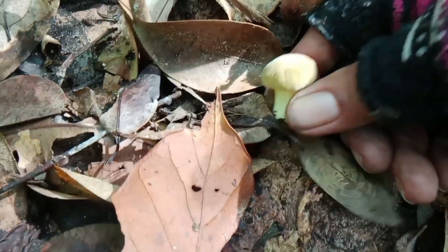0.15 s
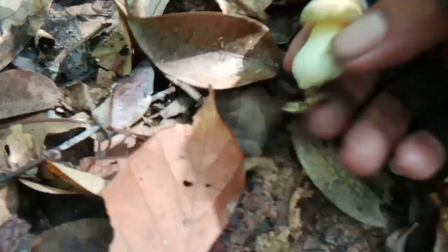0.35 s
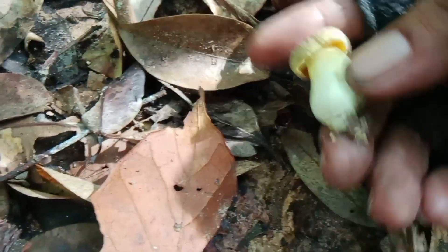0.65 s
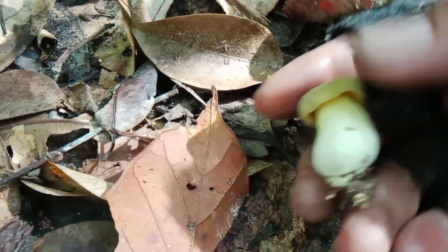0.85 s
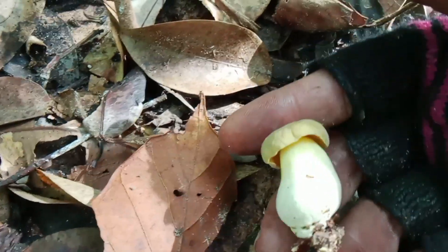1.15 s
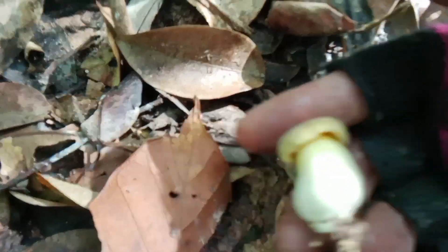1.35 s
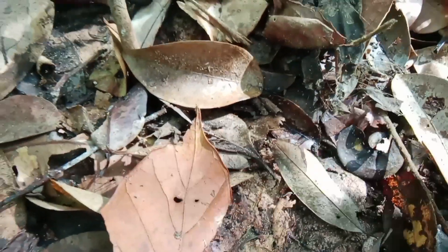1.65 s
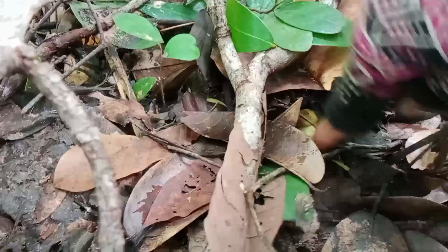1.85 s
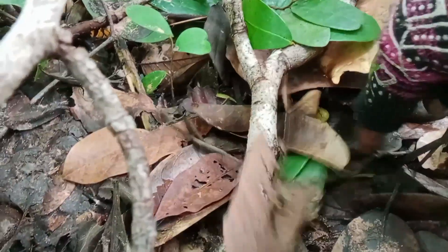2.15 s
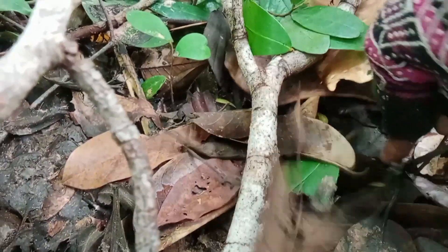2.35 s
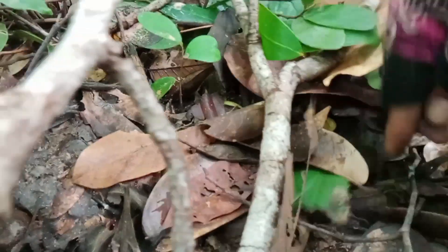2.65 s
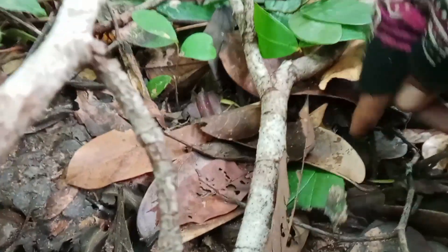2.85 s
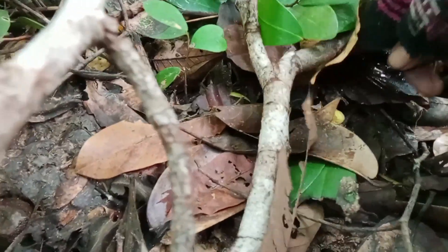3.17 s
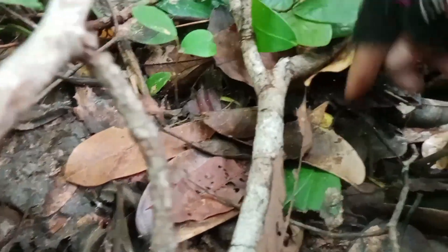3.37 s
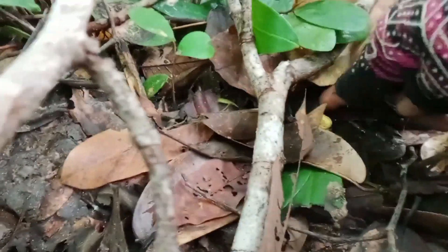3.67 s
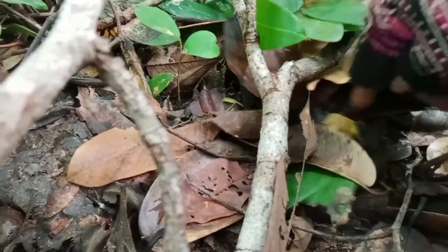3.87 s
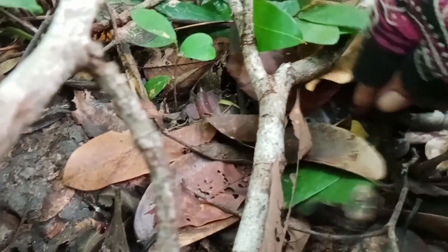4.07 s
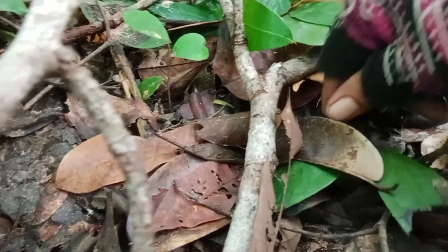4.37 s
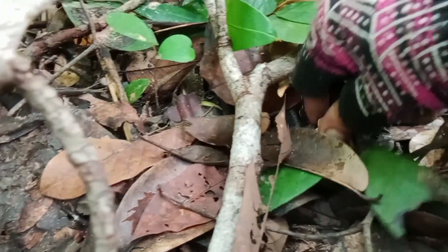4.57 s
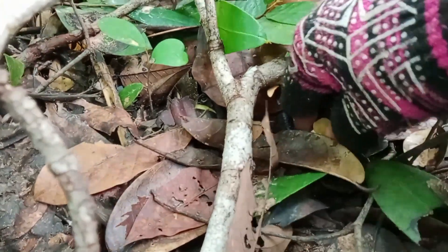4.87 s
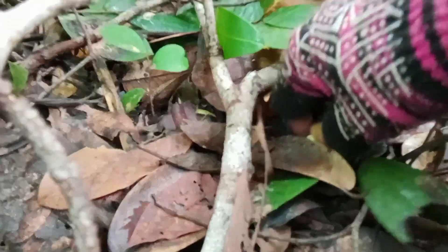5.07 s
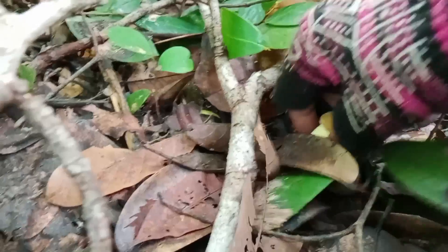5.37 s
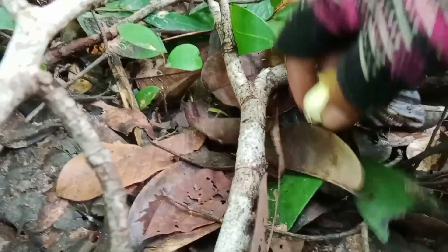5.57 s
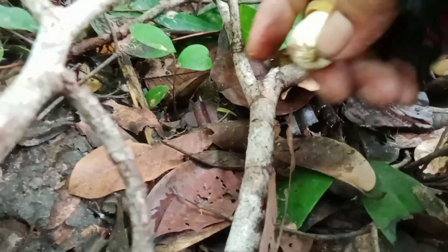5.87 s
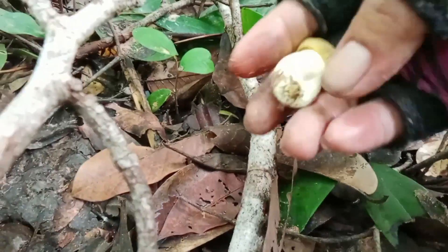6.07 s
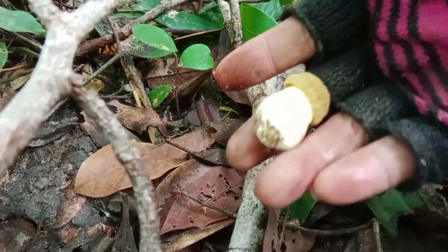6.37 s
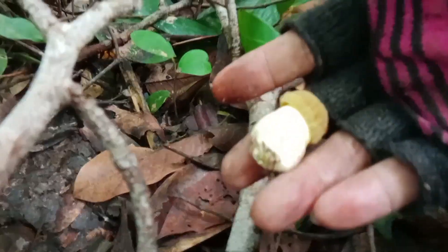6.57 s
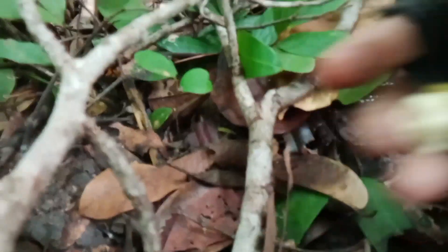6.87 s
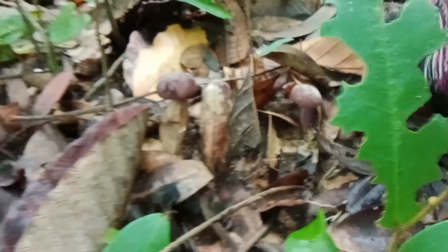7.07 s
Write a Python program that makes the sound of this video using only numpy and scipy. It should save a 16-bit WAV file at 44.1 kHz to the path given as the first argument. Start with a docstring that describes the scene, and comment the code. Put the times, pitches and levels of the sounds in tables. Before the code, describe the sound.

Close outdoor sound on a forest floor: faint leaf touches under steady, wavering insect trills, then sound cuts out briefly. It returns with louder crunching and crisp snapping of dry leaves and twigs, with dull soil rubbing, strongest mid-way. Handling thins to separate clicks while the cicadas swell and dip; a far bird glides downward, and silence blinks once more near the end.

```python
"""Mushroom picking in dry leaves

Forest floor, microphone close: a hand rustles, rubs and snaps leaf litter, made of tiny random fractures
ringing in resonances, single splinter bursts and a low noise rub of the soil. Among the trees two kinds of
cicada drone as pulsing, swinging tones; far off a bird calls in gliding whistles. Coloured noise makes the
distant air, and the handled microphone adds a low rumble. Twice the sound drops out for a moment."""
import sys
import numpy as np
from scipy import signal
from scipy.fft import rfft, irfft
from scipy.io import wavfile
from scipy.ndimage import uniform_filter1d

SR = 44100
rng = np.random.default_rng(int(sys.argv[2]) if len(sys.argv) > 2 else 0)


def persist_wave(psi):
    """Save psi, clipped to +-1, as 16-bit WAV."""
    counts = np.round(np.clip(psi, -1, 1) * 32767).astype(np.int16)
    wavfile.write(sys.argv[1], SR, np.atleast_2d(counts).T)


N = 318827

# Far air and insects, colour: (frequency [Hz], relative level per Hz [dB])
AIR_COLOUR = [(30, -16), (100, -10), (200, -1), (300, -2.5), (500, -5.5), (1200, -9.5), (3000, -14),
              (4200, -11.5), (6000, -12.5), (7700, -18.5), (8200, -17), (9500, -25.5), (10700, -36.5),
              (11400, -32), (12500, -41.5), (15000, -40)]
# Low rumble of the handled microphone: (time [s], level [dB])
RUMBLE_LEVEL = [(0, -69), (1.8, -71), (2.1, -60.5), (3.2, -62), (3.8, -67), (5.5, -65.5), (6.5, -66),
                (6.8, -61), (7.2, -70)]
# Colour of that rumble: (frequency [Hz], relative level per Hz [dB])
RUMBLE_COLOUR = [(25, -34.5), (55, -18.5), (77, 1.5), (100, -6.5), (150, 1), (200, -9.5), (300, -23.5),
                 (1000, -60)]
# Far bird: (start [s], length [s], start pitch [Hz], end pitch [Hz], level before mixing with its echoes [dB])
BIRD_WHISTLES = [(.03, 0.17, 2750, 2635, -67.5), (0.197, 0.22, 2450, 2350, -68),
                 (0.81, 0.053, 2274, 2320, -57.5), (0.833, 0.031, 3150, 3190, -61.5),
                 (5.71, 0.22, 3630, 3580, -74), (5.88, 0.16, 3430, 2920, -66),
                 (6.868, .12, 3400, 2870, -58)]

# Low cicadas among the trees, pitches before the stretch of the spot:
# (offset from the centre [Hz], pitch swing [Hz], mean pulse rate [1/s], relative level [dB])
LOW_CICADAS = [(-85.5, 29, 48, -1.5), (-9.5, 60, 29, 0.5), (26.5, 146, 34, -2.5), (81, 4.4, 58, -2.5)]
# High cicadas among the trees, pitches before the chorus stretch:
# (pitch [Hz], pitch swing [Hz], mean pulse rate [1/s], relative level [dB])
HIGH_CICADAS = [(6737, 48, 27, -7.5), (6910, 140, 81, -0.5), (7105, 67, 14, -2), (7123, 111, 39, 2),
                (7390, 54, 22, -10), (8362, 157, 61, -14), (4000, 32, 38, -26.5), (9920, 220, 64, -39.5)]
# Slow swell of the low chorus: (time [s], level [dB])
LOW_SWELL = [(0.0, -47.5), (2.0, -50.5), (2.1, -47), (2.7, -45), (3.2, -47.5), (3.8, -46.5), (4.1, -52),
             (4.2, -47.5), (5.0, -56.5), (5.1, -51), (5.3, -55), (5.4, -48.5), (5.5, -57.5), (6.3, -43.5),
             (6.4, -50.5), (6.7, -44.5), (6.8, -53.5), (7.1, -49.5), (7.2, -60)]
# Slow swell of the high chorus: (time [s], level [dB])
HIGH_SWELL = [(0.0, -53.5), (0.4, -51.5), (1.4, -55.5), (1.6, -52.5), (2.0, -56), (2.2, -48), (2.7, -48),
              (3.0, -50), (5.0, -56.5), (5.1, -53.5), (5.9, -55), (6.2, -50.5), (7.1, -56), (7.2, -62.5)]
# Low chorus at each picking spot, before its sway:
# (from [s], centre pitch [Hz], stretch of the pitch range [factor], a moment of highest pitch [s])
PICKING_SPOTS = [(0, 5098, 1.25, 1.0), (1.9, 5137, .98, 2.8)]
# Both choruses flutter at random around their swell
FLUTTER_DB, FLUTTER_RATE_HZ = 1.5, 5.8
# The low chorus sways, and its pitch range narrows (by this fraction) as it rises
SWAY_PERIOD_S, SWAY_HZ, SWAY_NARROWING = .99, 25.04, 0.1421

# Strokes of the near hand through the litter: (start [s], length [s], rustle level [dB],
# dull soil rub relative to the rustle [dB], crisp fizz relative to the rustle [dB])
HAND_STROKES = [(0, .09, -61, -4.5, -24.5), (0.11, .37, -68.5, -22, -22), (0.223, .03, -58.5, -19, -13),
                (0.559, 0.02, -60, -24, -5), (0.842, 0.023, -60, -25, -20), (0.931, .015, -66, -20, -16),
                (1.504, 0.011, -61.5, -18, -20), (1.602, .025, -60, -23, -24),
                (2.028, .15, -51.5, -17, -19.5), (2.212, 0.12, -43.5, -18, -14),
                (2.261, 0.031, -36.5, -10, -14.5), (2.447, 0.12, -37.5, -11, -18),
                (2.621, .055, -40, -13.5, -17), (2.683, .03, -36, -6, -9), (2.747, 0.022, -39, -7, -12.5),
                (2.785, .075, -50.5, -1.5, -20), (2.92, .08, -56.5, -16, -16),
                (3.038, 0.071, -35, -4.5, -11), (3.12, .04, -36.5, -21, -9.5),
                (3.212, .07, -42, -15.5, -20), (3.33, 0.018, -45, -14, -18), (3.359, 0.05, -37, -26, -16),
                (3.483, .06, -61, -17, -9), (3.651, 0.11, -50, -5, -16), (3.919, .06, -47, -20, -12.5),
                (4, .04, -40.5, -10.5, -16), (4.204, .05, -50.5, -15, -15), (4.308, 0.023, -55.5, -24, -22),
                (4.397, 0.015, -65, -13, -14), (4.491, .005, -49.5, -21, -12),
                (4.713, .025, -55, -17, -10.5), (4.816, 0.056, -55.5, -16.5, -6.5),
                (5.053, 0.04, -60.5, -12, -6.5), (5.217, .025, -50, -10, -15),
                (5.388, 0.24, -62, -12, -11.5), (5.622, .055, -47.5, -8, -16), (5.78, .015, -54, -6, -10),
                (6.292, .015, -59, -7, -10.5), (6.768, .015, -55.5, -9, -12), (6.949, .05, -58, -18, -22),
                (7.22, .013, -52, -20, -21.5)]
# Colour of the dry litter: (frequency [Hz], relative level per Hz [dB])
LITTER_COLOUR = [(60, -27.5), (200, -13.5), (440, -5), (630, 0.5), (780, -5.5), (1000, -1.5), (2200, 1.5),
                 (3200, 0), (4200, -2), (4700, -14.5), (6300, -25.5), (10000, -59.5)]
# Colour of the crisp fizz: (frequency [Hz], relative level per Hz [dB])
FIZZ_COLOUR = [(2000, -38.5), (5500, -9.5), (6400, -10.5), (7800, -1), (8600, -1.5), (9800, -23),
               (10700, -26.5), (11400, -22), (12500, -41), (13600, -32), (14400, -58)]
# Loud near snaps of leaves and stalks: (time [s], nominal peak level [dB], ring pitch [Hz])
LOUD_SNAPS = [(0.248, -45.5, 1530), (2.005, -26, 1670), (2.258, -27, 1000), (2.286, -16, 557),
              (2.331, -30, 2960), (2.446, -27, 972), (2.483, -24, 1070), (2.679, -25.5, 1850),
              (2.694, -19.5, 550), (2.823, -27.5, 425), (3.033, -23, 3400), (3.049, -17.5, 2090),
              (3.069, -22, 417), (3.096, -17.5, 1790), (3.214, -18.5, 1820), (3.229, -26, 1800),
              (3.25, -19.5, 1430), (3.294, -23, 1690), (3.351, -15.5, 1950), (3.371, -19.5, 1970),
              (3.384, -17.5, 2070), (3.4, -19.5, 2290), (3.729, -11, 1170), (3.733, -16, 2240),
              (4.011, -21.5, 1800), (4.208, -34, 606), (4.247, -27.5, 1160), (4.256, -34, 2220),
              (4.488, -30, 2630), (5.224, -27.5, 1520), (5.629, -32, 417), (5.768, -25, 1750),
              (6.663, -47.5, 2510), (6.77, -39, 980), (6.989, -38, 1180), (7.217, -36, 2300)]
# Colour of a single snap: (frequency [Hz], relative level per Hz [dB])
SNAP_COLOUR = [(60, -42.5), (300, -3.5), (600, -0.5), (2200, -1), (3200, -3), (4200, -8.5), (4800, -27),
               (6300, -33.5), (10000, -64)]
# Every stroke bites quickly, holds with a wavering pressure and lets go
STROKE_ATTACK_S, STROKE_RELEASE_S = 0.0023, .013
PRESSURE_DB, PRESSURE_RATE_HZ = 0.83, 25
# Glove and sleeve brush the leaves softly before and after it, for longer around a long stroke
BRUSH_DB, BRUSH_S, BRUSH_PER_LENGTH = -12, 0.019, 0.44
# Small snaps fall at random, a little above the rustle of the moment, ringing anywhere in this range
SMALL_SNAP_DB, SMALL_SNAP_SPREAD_DB, SMALL_SNAP_HZ = 9.5, 2.5, (700, 3400)
# A smaller piece rings higher and is crisper: fizz relative to the snap body at 2 kHz, and its rise with pitch
SNAP_FIZZ_DB, SNAP_FIZZ_DB_PER_KHZ = -26, 10

# Silences: (from [s], to [s])
DROPOUTS = [(1.843, 1.955), (7.104, 7.198)]
CUTOFF_HZ = 15700


def from_db(db):
    """Decibels to gain."""
    return 10 ** (np.asarray(db) / 20)


def rms_one(x):
    """Scale to unit power."""
    return x / np.sqrt(np.mean(x ** 2) + 1e-20)


def in_time(rows):
    """Each column of a curve, at every sample."""
    s, *columns = np.transpose(rows)
    return [np.interp(np.arange(N) / SR, s, column) for column in columns]


def drift(rate_hz):
    """Slow random wandering with spread 1: noise through two equal low-pass poles."""
    step = 40   # drawn once every 40 samples, joined by straight lines
    warm_up = 2000
    r = np.exp(-2 * np.pi * rate_hz * step / SR)
    noise = rng.standard_normal(N // step + warm_up + 2)
    slow = signal.lfilter([1], [1, -2 * r, r * r], noise)[warm_up:]
    return np.interp(np.arange(N) / step, np.arange(len(slow)), rms_one(slow))


def evened(x, seconds):
    """Hold the running level at 1, keeping the faster flutter."""
    power = uniform_filter1d(x ** 2, max(int(seconds * SR), 2))
    return x / np.sqrt(np.abs(power) + 1e-12)


def response(spectrum, size=2048):
    """Causal (minimum-phase) impulse response with the given colour, by folding its cepstrum."""
    hz, db = np.transpose(spectrum)
    grid = np.maximum(np.arange(size // 2 + 1) * SR / size, 1)
    gain = from_db(np.interp(np.log(grid), np.log(hz), db))
    cepstrum = irfft(np.log(gain))
    cepstrum[1:size // 2] *= 2
    cepstrum[size // 2 + 1:] = 0
    return irfft(np.exp(rfft(cepstrum)))


def coloured(x, spectrum):
    """Pass a sound through a colour."""
    return signal.fftconvolve(x, response(spectrum))[:N]


def resonance(x, hz, width_hz):
    """One two-pole resonance with gain 1 on top."""
    r = np.exp(-np.pi * width_hz / SR)
    feed = np.array([1, 0, -1]) * (1 - r * r) / 2
    poles = [1, -2 * r * np.cos(2 * np.pi * hz / SR), r * r]
    return signal.lfilter(feed, poles, x + 1e-18)


def scatter(x, t60):
    """Countless faint echoes from trunks and foliage, decaying 60 dB in t60 seconds, at unit power."""
    t = np.arange(int(t60 * SR)) / SR
    echoes = rng.standard_normal(len(t)) * from_db(-60 * t / t60)
    return signal.fftconvolve(x, echoes / np.linalg.norm(echoes))[:N]


def far_air(level_db, swell_db):
    """Distant air and insects merge into steady coloured noise with a slight swell."""
    noise = rms_one(coloured(rng.standard_normal(N), AIR_COLOUR))
    return from_db(level_db) * noise * from_db(swell_db * drift(2.1))


def handling_rumble(unsteady_db):
    """Low rumble of the handled microphone: noise in a low band, at an uneven level."""
    level_db, = in_time(RUMBLE_LEVEL)
    noise = rms_one(coloured(rng.standard_normal(N), RUMBLE_COLOUR))
    return from_db(level_db + unsteady_db * drift(10)) * noise


def bird(quaver_hz, t60):
    """Short gliding whistles with a quavering pitch, blurred by distance."""
    out = np.zeros(N)
    for start, length, start_hz, end_hz, db in BIRD_WHISTLES:
        along = np.clip((np.arange(N) / SR - start) / length, 0, 1)
        pitch = start_hz + (end_hz - start_hz) * along + quaver_hz * drift(120)
        tone = np.sin(2 * np.pi * np.cumsum(pitch) / SR)
        out += from_db(db) * np.sin(np.pi * along) * tone
    return 0.83 * out + scatter(out, t60)


def sway():
    """Centre pitch and pitch stretch of the low chorus, swinging about once a second."""
    t = np.arange(N) / SR
    since, centre_hz, stretch, crest_s = np.transpose(PICKING_SPOTS)
    spot = np.searchsorted(since[1:], t)
    swing = np.cos(2 * np.pi * (t - crest_s[spot]) / SWAY_PERIOD_S)
    return centre_hz[spot] + SWAY_HZ * swing, stretch[spot] * (1 - SWAY_NARROWING * swing)


def loudness(swell):
    """Gain of a chorus: its slow swell with a random flutter."""
    return from_db(in_time(swell)[0] + FLUTTER_DB * drift(FLUTTER_RATE_HZ))


def cicadas(singers, centre_hz, stretch, wander_hz, unsteady, swell_db, t60):
    """Each insect rings one shrill tone swinging with every pulse of its drum; the trees smear them together."""
    out = np.zeros(N)
    for hz, swing_hz, per_s, db in singers:
        beat = 2 * np.pi * np.cumsum(per_s * (1 + unsteady * drift(7.66))) / SR
        pitch = centre_hz + stretch * (hz + swing_hz * np.sin(beat)) + wander_hz * drift(25.96)
        tone = np.sin(2 * np.pi * np.cumsum(pitch) / SR)
        pulses = 1 + .5 * np.cos(beat)
        out += from_db(db + swell_db * drift(1.3)) * pulses * tone
    out *= np.tanh(np.arange(N) / SR / .004) ** 2   # soft start over a few ms
    return evened(out + 2 * scatter(out, t60), 0.16)


def strokes():
    """Levels in dB of rustle, soil rub and fizz: each stroke is attack, hold and release inside a soft brush."""
    t = np.arange(0, N, 20) / SR
    power = 1e-9
    for start, length, db, rub_db, fizz_db in HAND_STROKES:
        before = np.maximum(start - t, 0)
        after = np.maximum(t - start - length, 0)
        press = np.exp(-before / STROKE_ATTACK_S - after / STROKE_RELEASE_S)
        brush = from_db(BRUSH_DB) * np.exp(-(before + after) / (BRUSH_S + BRUSH_PER_LENGTH * length))
        gains = from_db([db, db + rub_db, db + fizz_db])
        power = power + np.outer(gains, np.maximum(press, brush)) ** 2
    levels_db = np.array(in_time(np.column_stack([t, 10 * np.log10(power.T)])))
    return levels_db + PRESSURE_DB * drift(PRESSURE_RATE_HZ)


def soil(level_db, rub_hz, width_hz):
    """Fingers pushing into the soft ground add a dull, lumpy rub: uneven noise in a low resonance."""
    lumps = rng.standard_normal(N) * from_db(2.9 * drift(45))
    rub = resonance(resonance(lumps, rub_hz, width_hz), rub_hz, width_hz)
    return from_db(level_db) * evened(rub, 0.17)


def rustle(level_db, fizz_db, per_s, spread_db, clump_db, cycles, shift_db, patches=24):
    """Tiny fractures come in clumps, faster under a firmer hand; each rings a patch of leaf for a few cycles."""
    rate = per_s * from_db(.12 * (level_db - level_db.max()) + clump_db * drift(50))
    sizes = from_db(spread_db * np.minimum(rng.exponential(1, N), 4)) * rng.choice([-1, 1], N)
    cracks = sizes * (rng.random(N) < rate / SR)
    patch = rng.integers(0, patches, N)
    sliding = from_db(-19) * np.std(cracks) * rng.standard_normal((2, N))

    # as the fingers move on, other patches of leaf take over: the colour keeps shifting
    rings = np.zeros(N)
    for k, hz in enumerate(np.geomspace(330, 6000, patches)):
        ring = resonance(cracks * (patch == k) + sliding[k % 2], hz, hz / cycles)
        rings += ring * np.sqrt(1000 / hz) * from_db(shift_db * drift(8.6))

    crackle = rms_one(rings) + 0.14 * rms_one(cracks)
    body = evened(coloured(crackle, LITTER_COLOUR), .03)
    fizz = evened(coloured(cracks + 4 * sliding[0], FIZZ_COLOUR), 0.12)
    return from_db(level_db) * (body + from_db(fizz_db) * fizz)


def small_snaps(rustle_db, count):
    """Chance snaps that follow the rustle: rows (time [s], nominal peak level [dB], ring pitch [Hz])."""
    when, strength, pitch = rng.random((count, 3)).T
    at = (when * N).astype(int)
    low_hz, high_hz = SMALL_SNAP_HZ
    db = rustle_db[at] + SMALL_SNAP_DB + SMALL_SNAP_SPREAD_DB * (2 * strength - 1)
    return list(zip(at / SR, db, low_hz * (high_hz / low_hz) ** pitch))


def snaps(rows, splinters_per_s, rise_s, fall_s, tail, tail_s, ring_gain, cycles, break_s, size=4096):
    """A leaf gives way in a burst of splinters that builds up, breaks and dies away, ringing at its own pitch."""
    lead = size // 8   # samples before the break
    out = np.zeros(N + 2 * size)
    t = (np.arange(size) - lead) / SR
    build_up = np.exp(-np.abs(t) / rise_s)
    die_away = np.exp(-np.abs(t) / fall_s) + tail * np.exp(-np.abs(t) / tail_s)
    shape = np.where(t < 0, build_up, die_away)
    body_colour, fizz_colour = response(SNAP_COLOUR), response(FIZZ_COLOUR)
    # the body of a snap holds as much energy as 0.4 ms at its nominal peak level
    packed = np.sqrt(.0004 * SR / size)
    for s, db, hz in rows:
        burst = shape * rng.standard_normal(size) * (rng.random(size) < splinters_per_s / SR)
        burst[lead] = 1   # the break itself
        ringing = burst + ring_gain * resonance(burst, hz, hz / cycles)
        body = signal.fftconvolve(ringing, body_colour)[:size]
        fizz = signal.fftconvolve(burst, fizz_colour)[:size]
        fizz_db = SNAP_FIZZ_DB + SNAP_FIZZ_DB_PER_KHZ * (hz / 1000 - 2)
        start = int((s + break_s) * SR)
        out[start:start + size] += from_db(db) * packed * (rms_one(body) + from_db(fizz_db) * rms_one(fizz))
    return out[lead:lead + N]


def scene():
    """The near hand in the leaves, in front of the far forest."""
    air = far_air(level_db=-66.5, swell_db=1.0)
    rumble = handling_rumble(unsteady_db=2.1)
    whistles = bird(quaver_hz=125, t60=0.39)
    centre_hz, stretch = sway()
    low = loudness(LOW_SWELL) * cicadas(LOW_CICADAS, centre_hz, stretch, wander_hz=12,
                                        unsteady=0.0405, swell_db=4.5, t60=0.55)
    # the high pitches are given outright, so their centre is 0
    high = loudness(HIGH_SWELL) * cicadas(HIGH_CICADAS, 0, 0.99, wander_hz=18,
                                          unsteady=0.0746, swell_db=1.5, t60=0.82)
    forest = air + rumble + whistles + low + high

    rustle_db, rub_db, fizz_db = strokes()
    ground = soil(rub_db, rub_hz=182, width_hz=342)
    leaves = rustle(rustle_db, fizz_db - rustle_db, per_s=4500, spread_db=5.5, clump_db=3.5,
                    cycles=9.1, shift_db=3.5)
    all_snaps = list(LOUD_SNAPS) + small_snaps(rustle_db, count=120)
    leaves += snaps(all_snaps, splinters_per_s=5500, rise_s=0.00098, fall_s=0.0036, tail=0.066,
                    tail_s=0.013, ring_gain=4.3, cycles=4.3, break_s=.002)
    leaf_echoes = from_db(-18.0) * scatter(leaves, t60=0.18)
    return (forest + ground + leaves + leaf_echoes)[None]


def record(dry):
    """The sound drops out twice and fades quickly back in; the top is cut by a steep low-pass."""
    t, gate = np.arange(N) / SR, np.ones(N)
    for start, end in DROPOUTS:
        fade_in = np.clip((t - end) / 0.016, 0, 1)
        gate *= np.where(t < start, 1, fade_in)
    low_pass = signal.ellip(10, .1, 80, CUTOFF_HZ, fs=SR, output="sos")
    return signal.sosfilt(low_pass, dry * gate + 1e-18)


dry = scene()
out = record(dry)
persist_wave(out)
```